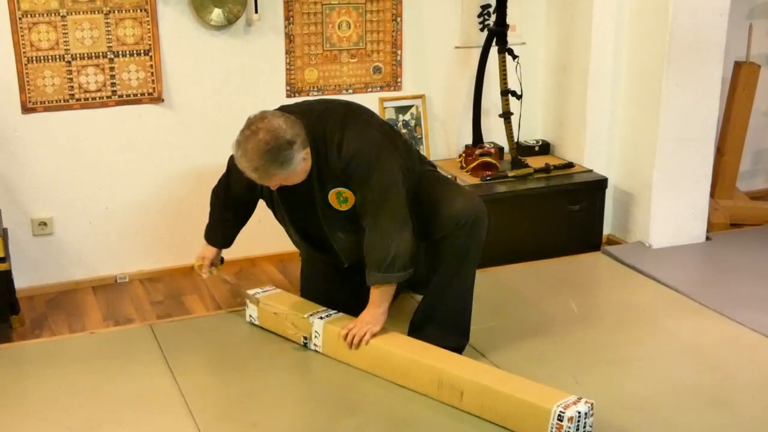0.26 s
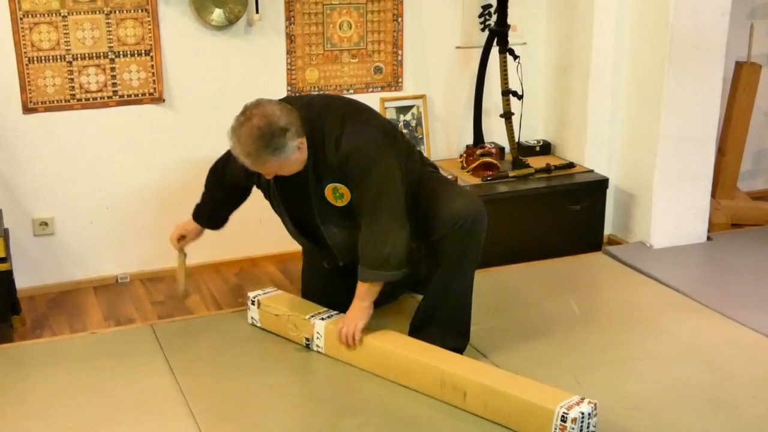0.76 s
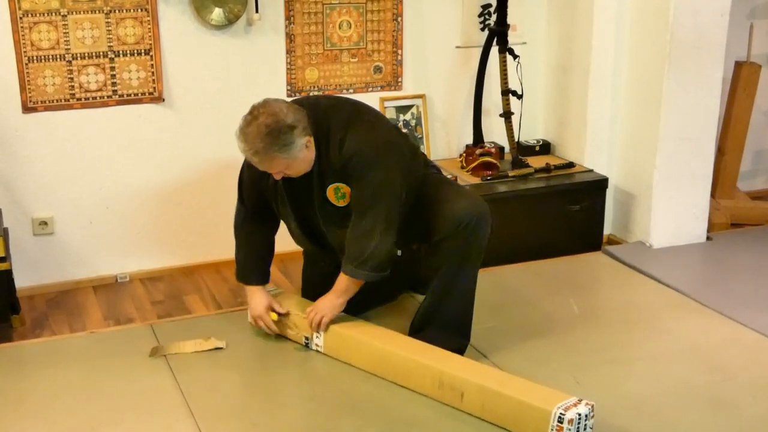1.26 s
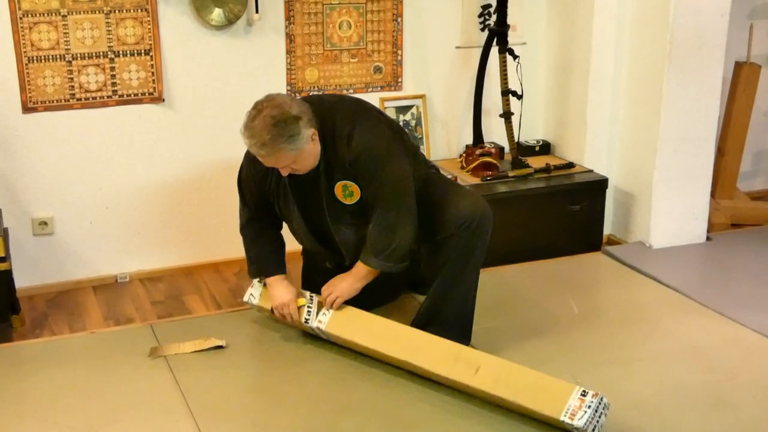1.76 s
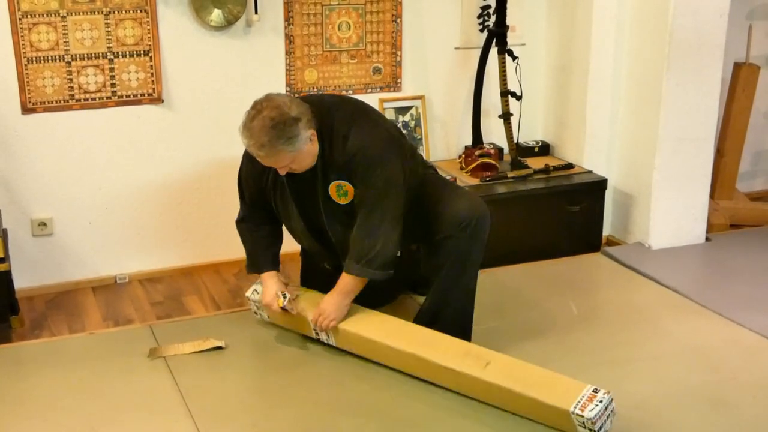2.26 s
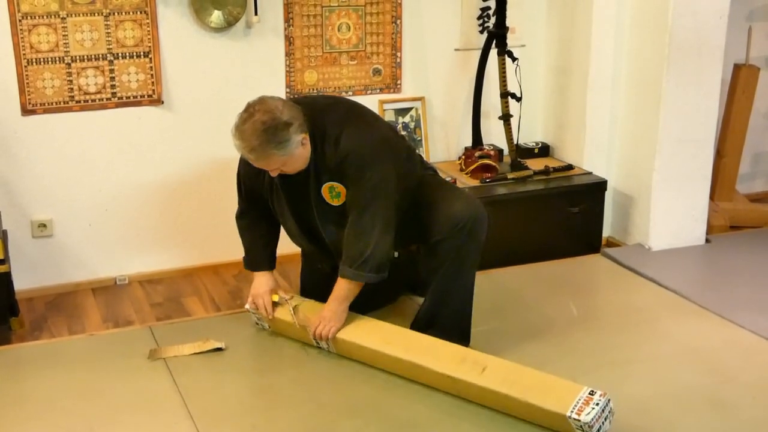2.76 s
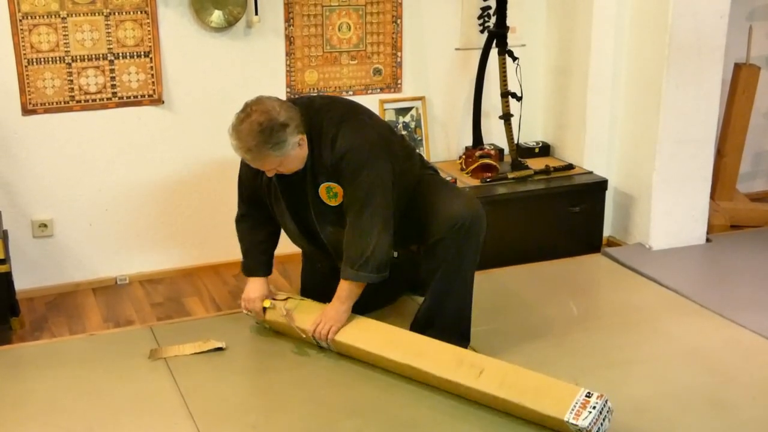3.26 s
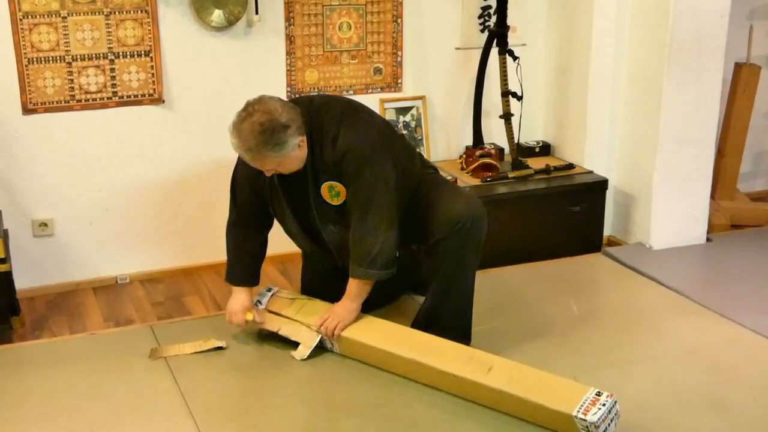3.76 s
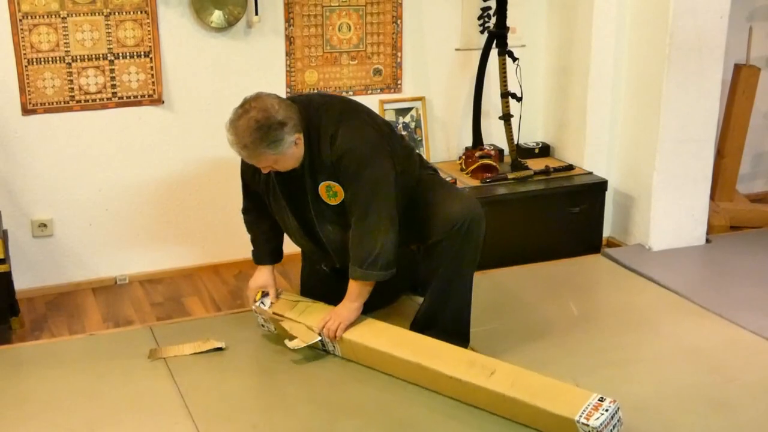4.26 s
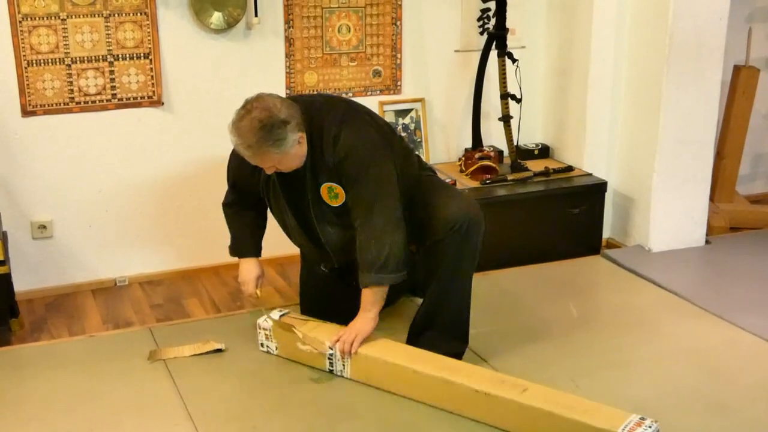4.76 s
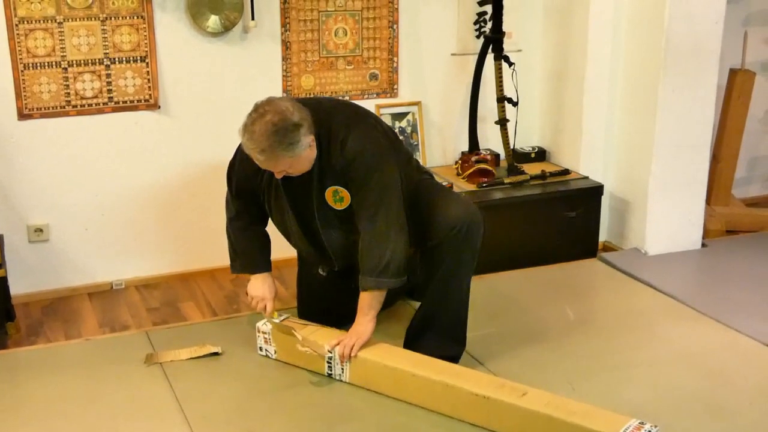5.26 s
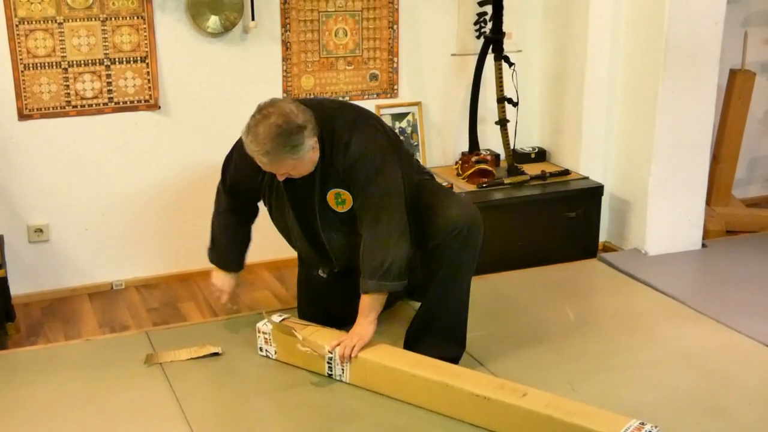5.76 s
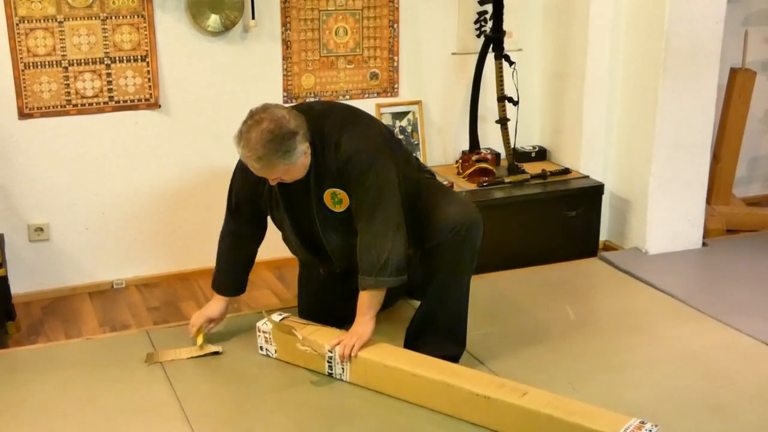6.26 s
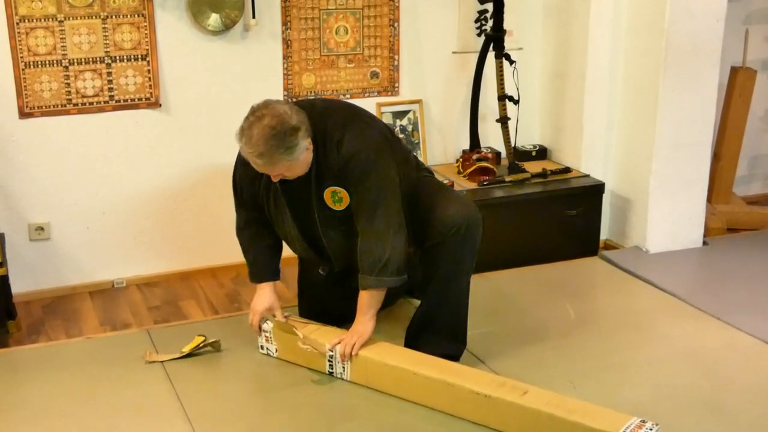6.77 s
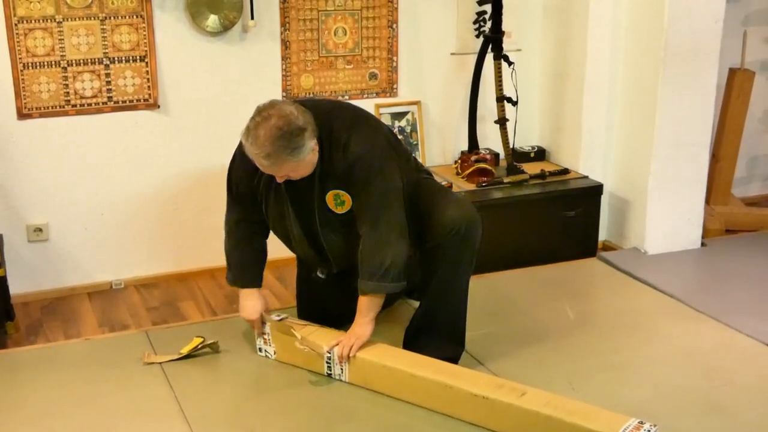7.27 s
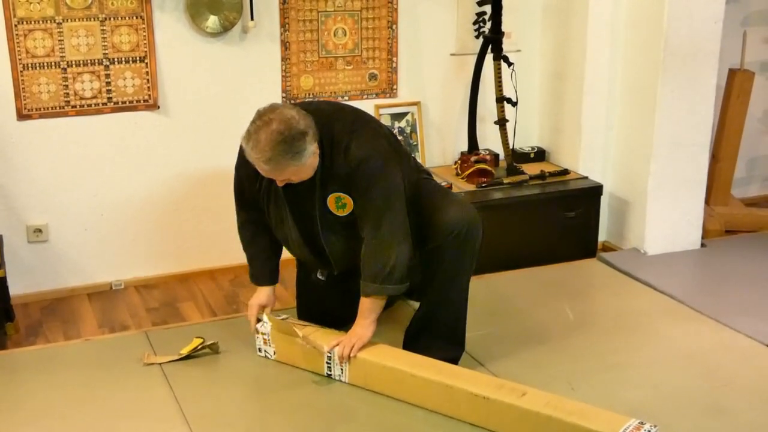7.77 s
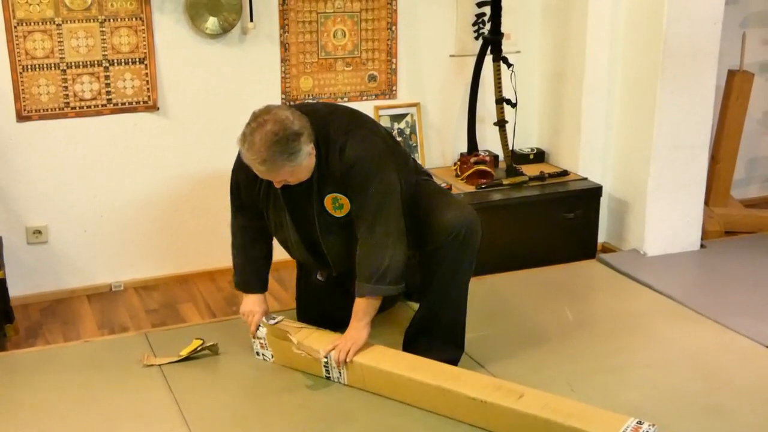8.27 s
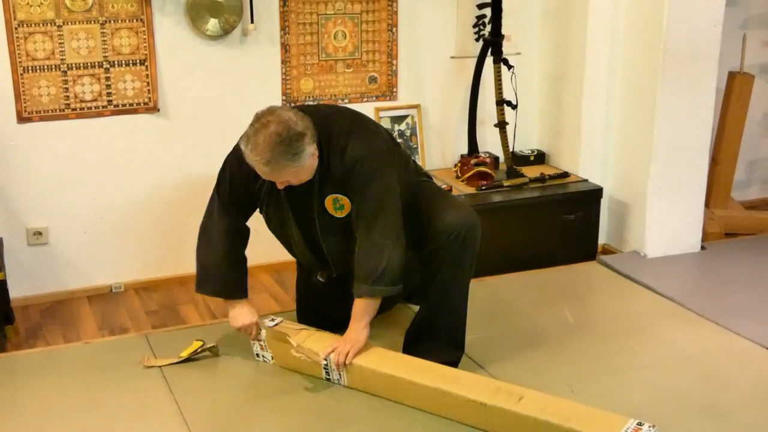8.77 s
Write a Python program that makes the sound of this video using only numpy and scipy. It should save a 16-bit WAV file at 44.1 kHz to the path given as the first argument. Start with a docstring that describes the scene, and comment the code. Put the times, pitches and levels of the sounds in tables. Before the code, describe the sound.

Packing tape rips off a long cardboard box, then the cardboard is torn in short, snapping pulls in a quiet, echoing room.

```python
"""Ripping tape off a cardboard box

Packing tape is pulled off a long box and its end is torn open in a bare, echoing room. Each pull is
stick-slip motion: a run of tiny slips that sound in the tape film, the paper fibres and the hollow box.
Flaps snap and shake, the box knocks and bumps, and torn strips are tossed onto the floor mat."""
import sys
import numpy as np
from scipy import signal
from scipy.fft import rfft, irfft, next_fast_len
from scipy.io import wavfile
from scipy.ndimage import uniform_filter1d

SR = 44100
rng = np.random.default_rng(int(sys.argv[2]) if len(sys.argv) > 2 else 0)


def pcm_store(signal):
    """Save signal as 16-bit PCM."""
    levels = np.round(np.clip(np.atleast_2d(signal), -1, 1) * 32767)
    wavfile.write(sys.argv[1], SR, levels.astype(np.int16).T)


N = 398223
TAPE_SLIPS_PER_S = 190

# tearing pulls: (start [s], length [s], swell [dB], film level [dB], fibre level [dB], box level [dB])
PULLS = [(0.0, 0.41, -9, -31, -36.5, -40.5), (0.294, 0.18, -5.5, -40.5, -32.5, -52),
         (1.764, 0.066, -4, -39, -37, -53), (1.932, 0.078, -2, -30, -31, -32),
         (2.055, 0.14, 6, -45, -39.5, -46.5), (3.04, 0.21, 3.5, -34.5, -31, -42.5),
         (3.272, 0.036, -2, -25.5, -24.5, -37), (3.35, 0.074, 2, -37, -31.5, -35.5),
         (3.438, 0.098, 1.5, -33, -29.5, -38.5), (5.474, 0.15, 8, -36.5, -29.5, -30.5),
         (7.158, 0.078, 4.5, -34, -51, -52), (7.905, 0.36, 3.5, -64, -44, -30.5)]
# fingers shift their grip: (start [s], length [s], film level [dB], fibre level [dB], box level [dB])
GRIPS = [(0.64, 0.33, -51, -53.5, -64), (1.138, 0.17, -46.5, -53.5, -48), (1.307, 0.27, -51.5, -52.5, -60),
         (1.568, 0.052, -37, -45, -43.5), (1.637, 0.096, -49, -48, -56), (2.267, 0.086, -42.5, -41.5, -48),
         (2.499, 0.17, -46, -51, -49.5), (2.709, 0.14, -54.5, -53, -42.5), (2.787, 0.096, -45.5, -43, -41),
         (2.929, 0.14, -44, -46, -42.5), (4.073, 0.091, -45.5, -48.5, -43.5), (4.195, 0.17, -48, -50, -45),
         (4.285, 0.2, -41, -49.5, -47), (4.498, 0.21, -44, -44.5, -48.5), (4.85, 0.028, -69, -58, -53.5),
         (5.03, 0.33, -59, -55.5, -58.5), (6.074, 0.13, -89, -74, -56), (6.233, 0.025, -35.5, -44, -65),
         (6.606, 0.042, -60, -64, -45.5), (6.695, 0.18, -47.5, -51.5, -50.5), (6.82, 0.23, -53, -53, -43.5),
         (6.956, 0.25, -45, -46, -47.5), (7.222, 0.081, -39.5, -47.5, -46), (7.368, 0.32, -54, -50, -49),
         (7.74, 0.24, -56, -55, -48.5), (8.222, 0.073, -47.5, -46, -38), (8.484, 0.11, -52.5, -55, -35),
         (8.585, 0.081, -34.5, -42, -44.5), (8.695, .31, -42, -55, -50)]
def pulls():
    """Incoherent addition: the powers of overlapping hand strokes sum to drive film, fibres and box."""
    power = sum(stroke(s, length, levels, swell, attack_s=.002) for s, length, swell, *levels in PULLS)
    power += sum(stroke(s, length, levels, swell_db=0, attack_s=.045) for s, length, *levels in GRIPS)
    film, fibre, box = np.sqrt(power)
    return tape_peel(film) + fibre_tear(fibre) + box_creak(box)


def stroke(start, length, levels_db, swell_db, attack_s):
    """Driven motion, then free decay: power rises, lasts while the hand moves and dies exponentially."""
    t = np.arange(SR) / SR
    onset = np.minimum(t / attack_s, 1)
    held_db = np.array(levels_db)[:, None] + swell_db * (np.minimum(t / length, 1) - .5)
    decay_db = np.outer([265, 105, 202], np.maximum(t - length, 0))  # dB/s: film, fibre, box
    power = np.zeros((3, N))
    add(power, start, (onset * amp(held_db - decay_db)) ** 2)
    return power


def stick_slip(rate_hz, jitter, scatter_db, life_s, clump_db, clump_hz, rasp_db):
    """Relaxation oscillation: tension builds and lets go in uneven bursts, over a fine rasp."""
    gaps, sizes = rng.standard_normal((N // 40, 2)).T
    onsets = (np.cumsum(np.exp(jitter * gaps)) * SR / rate_hz).astype(int)
    energies = amp(scatter_db * np.clip(sizes, -2, 2)) ** 2
    impulses = np.bincount(onsets[onsets < N], energies[onsets < N], N)
    bursts = signal.lfilter([1], [1, -np.exp(-1 / (life_s * SR))], impulses)
    power = (bursts / bursts.mean() + amp(rasp_db) ** 2) * amp(clump_db * wobble(clump_hz)) ** 2
    slips = np.sqrt(power) * rng.standard_normal(N)
    # the hand sets the work done in each stretch, however it is split among slips
    return slips / np.sqrt(np.abs(uniform_filter1d(slips ** 2, size=3000)) + 1e-9)


# spectrum of a slip in the film: (frequency [Hz], relative level [dB])
FILM_SPECTRUM = [(50, -48), (200, -10), (600, -2.5), (1500, -6), (2800, -3), (4200, -5), (5600, -4),
                 (8000, -5), (10000, -1.5), (12200, -13)]
def tape_peel(drive):
    """Stick-slip peeling: the glue lets go at nearly even intervals, in a fast zip."""
    slips = stick_slip(TAPE_SLIPS_PER_S, jitter=.2, scatter_db=13, life_s=.00041,
                       clump_db=1.5, clump_hz=80, rasp_db=0)
    return coloured(slips * drive, FILM_SPECTRUM)


# spectrum of breaking paper fibres: (frequency [Hz], relative level [dB])
FIBRE_SPECTRUM = [(40, -21), (90, -9), (160, -17), (380, -3.5), (700, 0.5), (1000, -3.5), (1550, -0.5),
                  (2200, -2), (3600, -5), (6500, -12.5), (12000, -19.5)]
def fibre_tear(drive):
    """Progressive fracture: fibres break at irregular intervals, in a dense crackle."""
    breaks = stick_slip(rate_hz=380, jitter=.7, scatter_db=4.5, life_s=.00086,
                        clump_db=2, clump_hz=80, rasp_db=-3)
    return coloured(breaks * drive, FIBRE_SPECTRUM)


# response of the hollow box: (frequency [Hz], relative level [dB])
BOX_SPECTRUM = [(40, -5), (95, -39.5), (160, -5), (300, 0), (450, 2), (580, 3), (750, -6), (1000, -7.5),
                (1400, -11), (1900, -20), (3000, -24.5), (6500, -36.5), (12000, -43)]
def box_creak(drive):
    """Forced vibration: slower jerks excite the resonances of the hollow box."""
    jerks = stick_slip(rate_hz=130, jitter=.35, scatter_db=4, life_s=.00054,
                       clump_db=-.5, clump_hz=59, rasp_db=-14.5)
    return coloured(jerks * drive, BOX_SPECTRUM)


# taut tape jumps in short trains of slips: (time [s], relative level [dB])
PEEL_JUMPS = [(.019, -5), (.046, -5), (.069, -3), (.09, -3), (.115, 0), (.14, -3), (.173, -5), (.194, -4),
              (.211, -3), (.232, -1), (.267, -7)]
def film_twangs(first_db=-5, loss_per_slip_db=4.5, click_db=-1.5):
    """Transverse vibration: each jump of the peel line clicks and plucks the stretched film."""
    clicks, twangs = np.zeros(N), np.zeros(N)
    for start, db in PEEL_JUMPS:
        hz = 5040 - 3300 * start  # the freed tape lengthens, so its pitch sinks
        for slip in range(3):
            s = start + slip / TAPE_SLIPS_PER_S
            size = amp(first_db + db - loss_per_slip_db * slip + rng.standard_normal())
            add(twangs, s, size * damped_ring(hz * np.exp(rng.normal(0, .07)), cycles=2))
            add(clicks, s, size * amp(click_db) * burst(life_s=.0006))
    return twangs + coloured(clicks, FILM_SPECTRUM)


def judder(start_s=7.94, end_s=8.27, rate_hz=54, wall_hz=640, level_db=-13, scatter_db=1.5):
    """Periodic excitation: in one slow pull the board yields in near-even jerks that knock the wall."""
    out = np.zeros(N)
    for s in np.arange(start_s, end_s, 1 / rate_hz):
        late, size, detune = rng.standard_normal(3)
        knock = jolt(wall_hz * np.exp(.12 * detune))
        add(out, s + .00153 * late, amp(level_db + scatter_db * size) * knock)
    return out


# tape or board gives way at once: (time [s], crack level [dB], knock level [dB])
SNAPS = [(.121, -36, -9.5), (1.743, -8, -17.5), (1.905, -8.5, -8), (1.93, -7, -6), (3.029, -20, -30),
         (3.045, -5, -6), (3.053, -23, -4.5), (3.123, -9, -23), (3.208, -11, -11), (3.256, -8.5, -13),
         (3.279, -6.5, -11), (3.302, -18, -13), (3.485, -16.5, -17), (4.106, -39, -26.5), (4.311, -47, -21),
         (4.47, -16.5, -20), (5.064, -28, -28), (5.222, -22.5, -14), (5.486, -6.5, -2.5), (5.526, -10, -31),
         (5.604, -12, -8.5), (6.735, -23.5, -34), (7.175, -18, -16), (7.567, -28.5, -20.5),
         (7.914, -46, -9), (7.923, -42, -14), (8.033, -43, -14), (8.193, -38, -4.5)]
# spectrum of a crack: (frequency [Hz], relative level [dB])
CRACK_SPECTRUM = [(60, -19), (250, -13), (600, 1.5), (1500, 2), (2800, -0.5), (4500, -3), (8000, -7),
                  (10200, -2.5), (12200, -17.5)]
def snaps(wall_hz=593):
    """Sudden release of strain: the break cracks, and the freed wall of the box knocks."""
    cracks, knocks = np.zeros(N), np.zeros(N)
    for s, crack_db, knock_db in SNAPS:
        add(cracks, s, amp(crack_db) * burst(life_s=.0022))
        add(knocks, s, amp(knock_db) * damped_ring(wall_hz, cycles=.9))
    return coloured(cracks, CRACK_SPECTRUM) + knocks


# the box is jolted against the mat: (time [s], level [dB])
BUMPS = [(1.897, -9), (3.361, -11.5), (4.106, -23), (4.473, -12), (7.748, -22), (8.51, -18), (8.543, -12),
         (8.567, -14)]
def bumps(thud_hz=372):
    """Damped impact: the whole box thuds dully on the mat."""
    out = np.zeros(N)
    for s, db in BUMPS:
        add(out, s, amp(db) * jolt(thud_hz))
    return out


def jolt(knock_hz, body_hz=195, body_db=-20.5):
    """Superposition of modes: a short knock over the low ring of the box's whole length."""
    return damped_ring(knock_hz, cycles=.89) + amp(body_db) * damped_ring(body_hz, cycles=1.4)


# a freed strip or flap shakes: (time [s], time constant [s], panel frequency [Hz], panel level [dB],
# edge frequency [Hz], edge level [dB])
FLAPS = [(.3, 0.31, 726, -49, 3900, -32.5), (.963, 0.037, 235, -27.5, 1670, -42),
         (1.896, 0.013, 330, -18.5, 1790, -20.5), (3.356, 0.0074, 247, -17, 1350, -12.5),
         (3.38, 0.18, 240, -39.5, 1420, -29.5), (4.464, 0.023, 230, -34, 4640, -40),
         (5.221, 0.0095, 1005, -28.5, 4600, -34), (5.485, 0.0068, 780, -13.5, 5450, -19),
         (5.575, 0.081, 760, -26, 1460, -34), (6.297, 0.05, 254, -25.5, 4120, -27)]
def flaps(panel_q=2.4, edge_q=2.7):
    """Resonance under random forcing: a torn flap's panel hums low and its stiff edge rasps higher."""
    out, t = np.zeros(N), np.arange(SR // 2) / SR
    for s, life_s, panel_hz, panel_db, edge_hz, edge_db in FLAPS:
        shake = np.exp(-t / life_s - (t / .33) ** 4)  # dies away within about a third of a second
        shake_rms = np.sqrt(np.mean(shake ** 2))
        for hz, db, q in (panel_hz, panel_db, panel_q), (edge_hz, edge_db, edge_q):
            band = signal.butter(2, hz * np.exp(np.array([-.5, .5]) / q), "bandpass", fs=SR, output="sos")
            ring = signal.sosfilt(band, rng.standard_normal(len(t)) * shake)
            add(out, s, amp(db) * unit(ring) * shake_rms)
    return out


# tossed strips land: (time [s], slap level [dB], thump level [dB], thump frequency [Hz])
LANDINGS = [(0.963, -25, -18, 240), (6.294, -10, -12, 268)]
# each strip hits and flops over: (delay [s], relative level [dB])
FLOPS = [(0, -1.5), (.074, -7), (.11, -12)]
# spectrum of a slap: (frequency [Hz], relative level [dB])
SLAP_SPECTRUM = [(80, -36), (380, 5), (680, -3), (1030, 9.5), (1450, -4.5), (2250, 7), (3000, 4.5),
                 (3900, 4), (5800, 2), (6800, 5.5), (8000, -3), (10000, 4), (12200, -11)]
def landings():
    """Impact and air displacement: a flat strip slaps the mat, and the air squeezed out thumps."""
    slaps, thumps = np.zeros(N), np.zeros(N)
    for s, slap_db, thump_db, hz in LANDINGS:
        for delay, flop_db in FLOPS:
            add(slaps, s + delay, amp(slap_db + flop_db) * burst(life_s=.011))
            add(thumps, s + delay, amp(thump_db + flop_db) * damped_ring(hz, cycles=1.7))
    return coloured(slaps, SLAP_SPECTRUM) + thumps


# reflections from the floor and near walls: (frequency [Hz], level [dB])
EARLY_REFLECTIONS = [(200, -34.5), (600, -28), (2000, -31.5), (5000, -28.5), (11000, -30.5)]
# reverberation time of the room: (frequency [Hz], time to fall 60 dB [s])
REVERB_TIMES = [(100, 0.61), (260, 0.64), (700, 0.9), (1800, 1.042), (4500, 0.92), (7500, 0.75),
                (11500, 0.52)]
# stereo width of the echoes: (frequency [Hz], side level relative to mid [dB])
ECHO_WIDTH = [(60, 3), (140, -35), (300, -11.5), (1000, -6), (4000, -7), (8000, -5), (11500, -3)]
def echoes(early_life_s=.01, tail_db=-37.5):
    """Reverberation: a mid and side impulse response, early reflections first, treble dying soonest."""
    hz, t, noise = signal.stft(rng.standard_normal((2, SR)), SR, nperseg=256)
    tail = amp(tail_db - 60 * t / along(REVERB_TIMES, hz)[:, None])
    early = amp(along(EARLY_REFLECTIONS, hz))[:, None] * np.exp(-t / early_life_s)
    spread = np.array([np.ones(len(hz)), amp(along(ECHO_WIDTH, hz))])[:, :, None]
    response = signal.istft(noise * np.hypot(early, tail) * spread, SR, nperseg=256)[1]
    return np.pad(response, ((0, 0), (SR // 400, 0)))  # 2.5 ms behind the direct sound


def room(source, path_sets=6, direct_db=-5.5):
    """Changing directivity: the bending board radiates along a shifting mix of echo paths."""
    shares = np.array([wobble(rate_hz=55) for _ in range(path_sets)])
    shares /= np.linalg.norm(shares, axis=0)
    mid, side = sum(signal.oaconvolve((source * share)[None], echoes(), axes=1)[:, :N] for share in shares)
    mid = mid + amp(direct_db) * source  # the direct sound comes from straight ahead
    return np.array([mid + side, mid - side])


# spectrum of the noise floor: (frequency [Hz], relative level [dB])
FLOOR_SPECTRUM = [(25, 8), (60, 0), (150, 15), (500, 17.5), (1500, 0), (5000, 0.5), (12000, -3)]
def noise_floor(mid_db=-58.5):
    """Stationary noise: faint hiss and rumble, only partly correlated between the channels."""
    mid, side = (unit(coloured(rng.standard_normal(N), FLOOR_SPECTRUM)) for _ in range(2))
    return amp(mid_db) * (mid + amp(-1) * np.array([side, -side]))


def burst(life_s):
    """Broadband transient: noise that builds quickly and decays with this time constant."""
    t = np.arange(SR // 10) / SR
    return rng.standard_normal(len(t)) * np.exp(-t / life_s) * (1 - np.exp(-4 * t / life_s))


def damped_ring(hz, cycles):
    """Damped oscillator: its decay envelope falls to 1/e in this many cycles."""
    turns = hz * np.arange(SR // 10) / SR
    return np.sin(2 * np.pi * turns) * np.exp(-turns / cycles) * (1 - np.exp(-2 * turns))


def coloured(x, spectrum, size=4096):
    """Minimum-phase filtering: imposes the spectrum and keeps the power of white noise."""
    gain = unit(amp(along(spectrum, np.fft.rfftfreq(size, 1 / SR))))
    cepstrum = irfft(np.log(gain))
    cepstrum[1:size // 2] *= 2  # folding the cepstrum makes the filter causal
    cepstrum[size // 2 + 1:] = 0
    return signal.oaconvolve(x, irfft(np.exp(rfft(cepstrum))))[:N]


def wobble(rate_hz):
    """Random modulation: straight lines between values drawn at this rate."""
    knots = rng.standard_normal(N // 20)
    return np.interp(np.arange(N) * rate_hz / SR, np.arange(len(knots)), knots)


def along(points, hz):
    """Interpolation of (frequency, value) points on a log frequency axis."""
    frequencies, values = np.transpose(points)
    return np.interp(np.log(hz + 1), np.log(frequencies), values)


def amp(db):
    """Amplitude ratio of a level in decibels."""
    return 10 ** (np.asarray(db) / 20)


def unit(x):
    """Normalisation to rms 1."""
    return x / np.sqrt(np.mean(x ** 2) + 1e-20)


def add(track, s, sound):
    """Superposition: mixes a sound into the track from time s on."""
    part = track[..., max(round(s * SR), 0):][..., :sound.shape[-1]]
    part += sound[..., :part.shape[-1]]


def scene():
    """Linear superposition: all the handling happens at one spot and excites the same room."""
    handling = pulls() + film_twangs() + judder() + snaps() + bumps() + flaps() + landings()
    return room(handling) * amp([[.3], [-.3]])  # slightly louder on the left


def record(dry, low_cut_hz=129, top_hz=12250):
    """Band limiting: the microphone thins the bass, faint noise joins in, and the top is cut steeply."""
    low_cut = signal.butter(2, low_cut_hz, "highpass", fs=SR, output="sos")
    heard = signal.sosfilt(low_cut, dry) + noise_floor()
    size = next_fast_len(N + SR // 2)
    high_cut = 1 / (1 + (np.fft.rfftfreq(size, 1 / SR) / top_hz) ** 160)
    return irfft(rfft(heard, size) * high_cut, size)[:, :N]


dry = scene()
out = record(dry)
pcm_store(out)
```